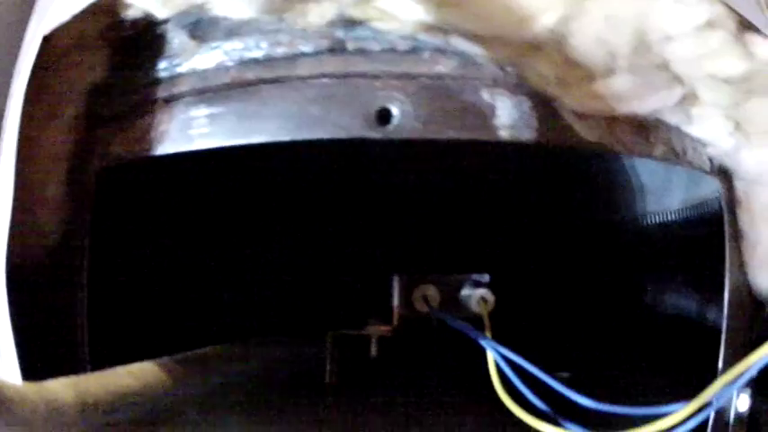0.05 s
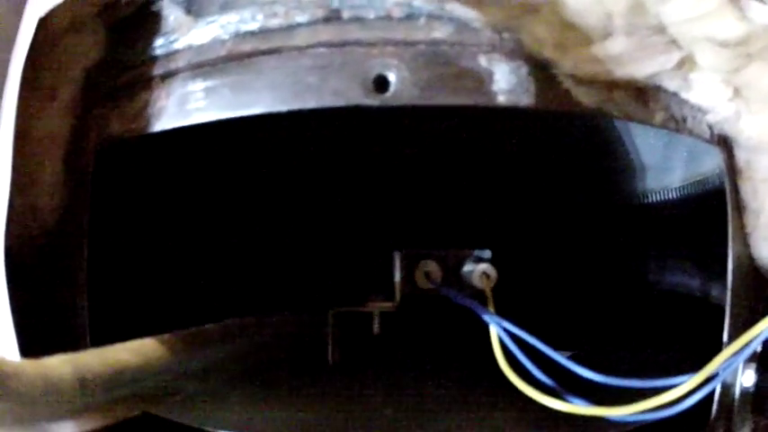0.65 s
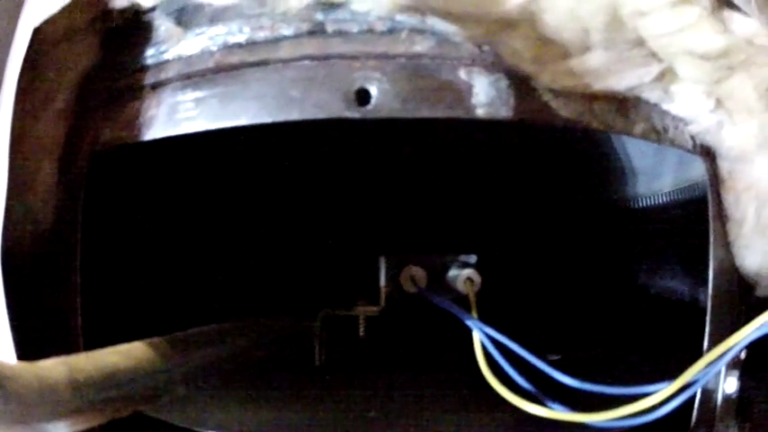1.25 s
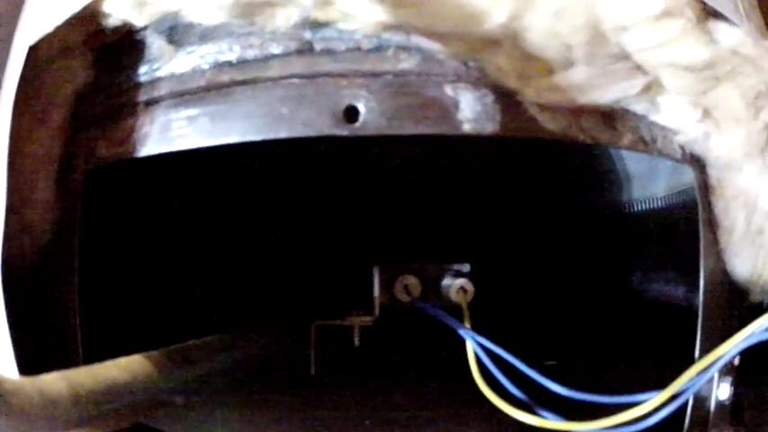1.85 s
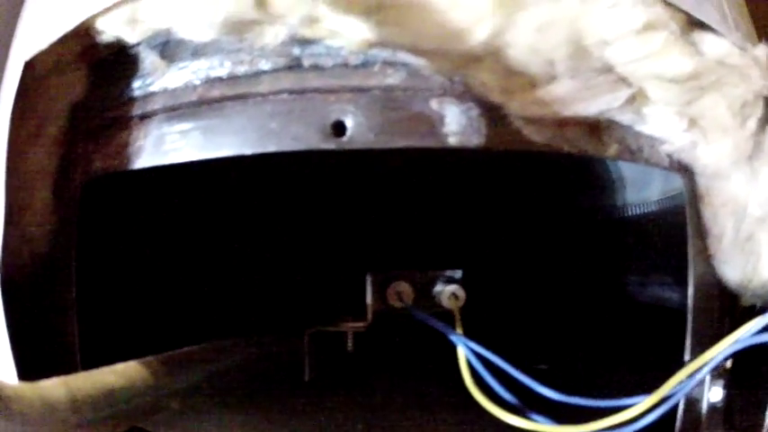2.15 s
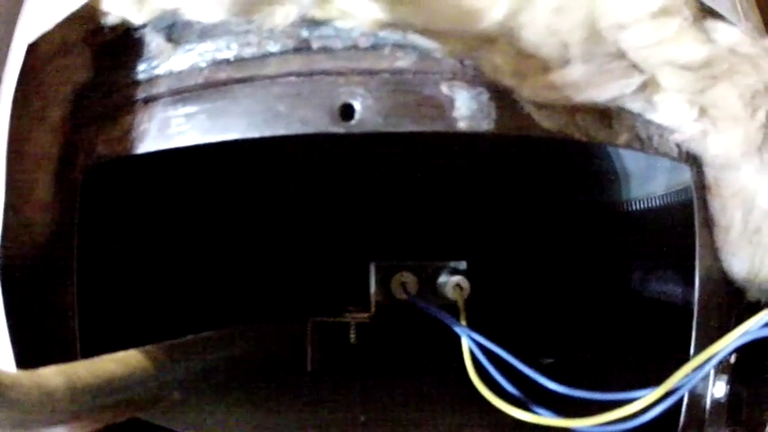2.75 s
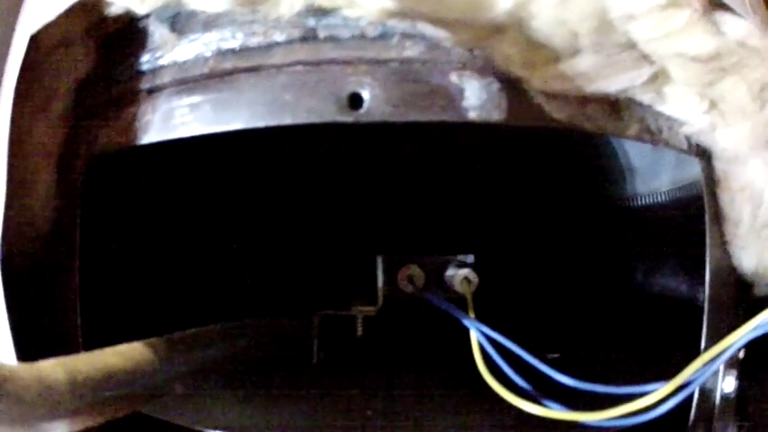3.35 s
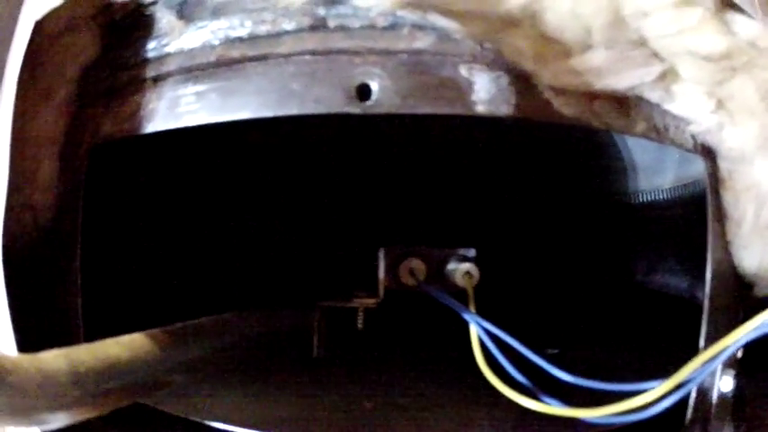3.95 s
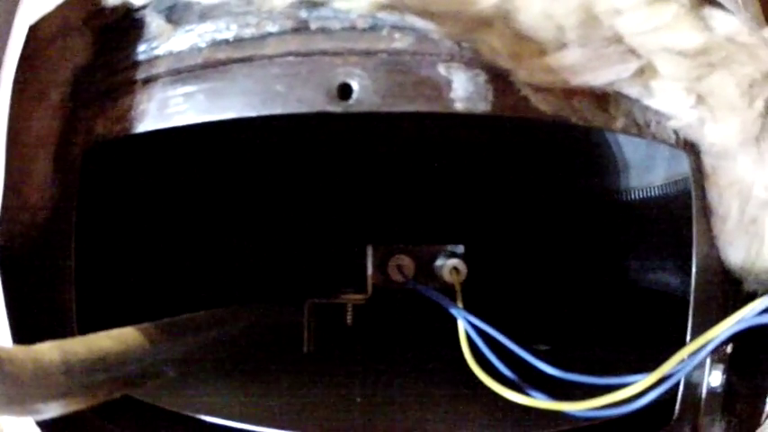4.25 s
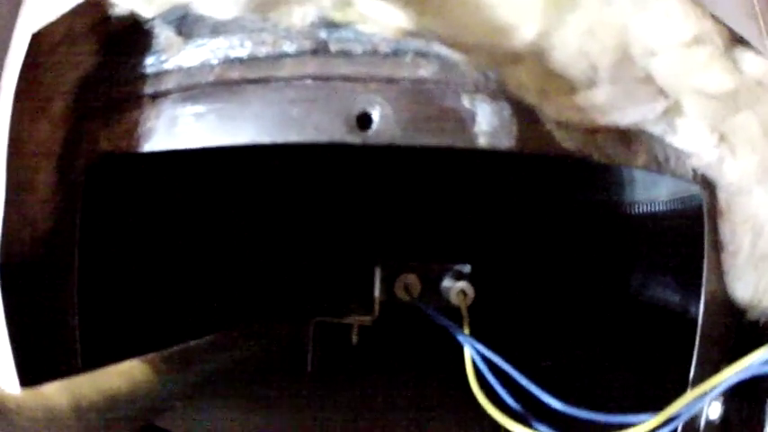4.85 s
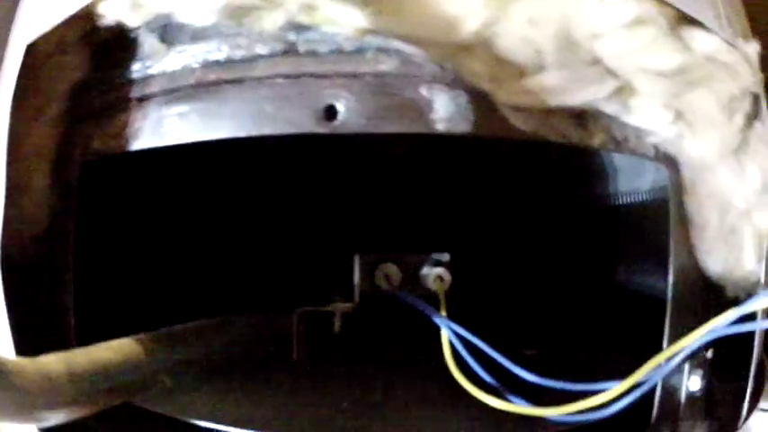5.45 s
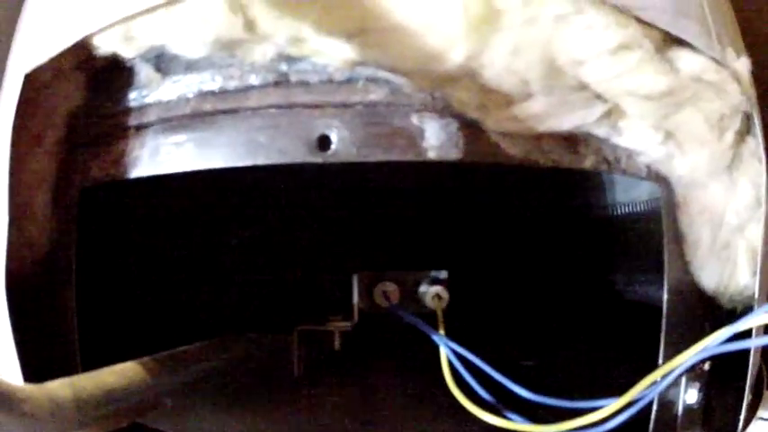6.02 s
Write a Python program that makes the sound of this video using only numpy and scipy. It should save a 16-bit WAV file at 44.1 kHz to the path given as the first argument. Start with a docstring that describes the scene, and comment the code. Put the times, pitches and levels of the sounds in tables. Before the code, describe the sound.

Heard close to the open hatch of a gas water heater in a utility space, the flue booms steadily as the blower pushes air through the vent. A faint motor whine and a thin high sizzle sit above the rumble. Small sounds barely break through: first a dull bump, then a brief rustle, a light metallic click and two last soft rustles, while the heater keeps running.

```python
"""A gas water heater runs in a utility space, heard close to its open burner hatch.
From the start, the venting blower's draught keeps the flue booming near 118 Hz, rings the tank's
cavities and rushes through the vent; the motor whines faintly. A dull bump comes at 1.2 s and a soft
rustle at 2.3 s; sheet metal ticks at 3.2 s, and two more rustles follow near 6 s. Throughout, a
low-rate sample-and-hold mirrors the sound into a thin treble sizzle."""
import sys
import numpy as np
from scipy import signal
from scipy.fft import rfft, irfft, next_fast_len
from scipy.io import wavfile
from scipy.ndimage import uniform_filter1d

SR = 44100
rng = np.random.default_rng(int(sys.argv[2]) if len(sys.argv) > 2 else 0)


def persist_wave(psi):
    """Save psi, clipped to +-1, as 16-bit WAV."""
    counts = np.round(np.clip(psi, -1, 1) * 32767).astype(np.int16)
    wavfile.write(sys.argv[1], SR, np.atleast_2d(counts).T)


N = 268348
TIME = np.arange(N) / SR

# The loudest random swells of the low boom.
# Each row: start in seconds, length in seconds, level in dB before SWELL_GAIN_DB.
BOOM_SWELLS = [(0.447, 0.081, -8), (0.609, 0.036, -5.5), (0.705, 0.035, -8), (1.142, 0.028, -8),
               (1.75, 0.039, -7.5), (3.115, 0.043, -8.5), (3.245, 0.088, -14), (3.583, 0.046, -9.5),
               (4.002, 0.047, -8), (4.264, 0.044, -7), (4.688, 0.033, -9), (4.902, 0.019, -5),
               (5.15, 0.055, -9), (5.514, 0.027, -6)]
# The flue's two lowest resonances. Each row: frequency in Hz, width in Hz, relative level in dB.
FLUE_MODES = [(116, 23, 0.5), (149.9, 33.7, -5.5)]
# Cavities of chamber and vent. Each row: frequency in Hz, width in Hz, relative level in dB.
CAVITY_MODES = [(202.5, 40.5, 0.5), (247.2, 38.7, 0.5), (320.9, 11.5, -11), (361, 25.7, -10.5),
                (456.4, 45, -14.5), (519.4, 26, -13), (610.4, 35, -12.5)]
# The rush of air. Each row: frequency in Hz, relative spectral density in dB.
RUSH_SPECTRUM = [(20, -11), (35, -11), (55, -2.5), (90, 6.5), (170, 2), (280, -7.5), (400, -13), (660, -15),
                 (790, -24.5), (1300, -22.5), (1700, -27.5), (2700, -31), (3600, -34), (5600, -37)]
# Resonances of the steel jacket. Each row: frequency in Hz, width in Hz, rms level in dB.
JACKET_MODES = [(734, 38, -54.5), (851, 58, -50), (990, 81, -53.5), (1163, 61, -48.5), (1410, 200, -52),
                (1795, 32, -56), (1980, 130, -54), (2306, 26, -60.5), (2527, 32, -57.5), (2580, 32, -56.5),
                (2667, 33, -60.5), (3210, 47, -60.5), (4664, 110, -60.5), (4990, 56, -60.5)]
# Tones of the blower. Each row: frequency in Hz, rms level in dB, pitch wander in Hz.
MOTOR_TONES = [(57.3, -38.5, 1), (430.6, -35, 1.265), (479.7, -42, 0.61), (743, -67, 0.78),
               (887, -54.5, 0.59), (995, -53, 0.51), (1903, -59, 0.67), (1978, -65, 0.78)]
# Soft rustles. Each row: centre in seconds, Gaussian width in seconds, rms level at the centre in dB.
RUSTLE_SWELLS = [(2.343, 0.018, -43), (5.73, .01, -43), (6.025, 0.01, -38.5)]
# The stutter of contacts in one tick. Each row: time in seconds, relative force in dB.
TICK_CONTACTS = [(3.248, -21), (3.2493, -15), (3.25, -22), (3.2503, -15.5), (3.2523, -24)]
# Modes of the sheet metal. Each row: frequency in Hz, gain in dB, time to fall 60 dB in seconds.
METAL_MODES = [(1157, -15, 0.045), (1690, -13.5, 0.039), (2400, -6, 0.022), (2720, -11.5, 0.033),
               (3200, -20, 0.012), (3510, -11, 0.017), (4480, -8.5, 0.071), (4760, -0.5, 0.012),
               (5390, -1, 0.021)]

BOOM_DB, THROB_DB, THROB_HZ, SWELL_GAIN_DB = -11, 1.15, 11.6, -1.5
CHURN_DB, CHURN_SWELL_DB, CHURN_SWELL_HZ = -22.5, 0.88, 3.8
RUSH_DB, FLUTTER_DB, FLUTTER_HZ = -24.5, 0.45, 14
BUMP_AT_S, BUMP_WIDTH_S, BUMP_DB = 1.175, 0.008, -26.5
CRACK_GAIN_DB, CRACK_T60_S, ROOM_GAIN_DB, ROOM_T60_S = -6.5, 0.013, -22.5, 0.13
BAND_HZ, HOLD_HZ, CUTOFF_HZ = 5500, 12000, 15400


def from_db(db):
    """Amplitude grows tenfold for every 20 dB."""
    return 10 ** (np.asarray(db) / 20)


def unit_rms(x):
    """Division by the rms gives a signal unit power."""
    return x / np.sqrt(np.mean(x ** 2) + 1e-20)


def drift(rate_hz):
    """Low-passed noise is a slow random fluctuation, here of unit spread."""
    step, settle = 40, 2000
    pole = np.exp(-2 * np.pi * rate_hz * step / SR)
    noise = rng.standard_normal(N // step + settle + 2)
    slow = signal.lfilter([1], [1, -2 * pole, pole ** 2], noise)[settle:]
    return np.interp(np.arange(N) / step, np.arange(len(slow)), unit_rms(slow))


def blown_modes(modes):
    """Forced resonance: turbulence drives each mode to a steady, narrow band of noise."""
    out = np.zeros(N)
    for hz, width, db in modes:
        radius = np.exp(-np.pi * width / SR)
        stage = [1 - radius, 0, radius - 1, 1, -2 * radius * np.cos(2 * np.pi * hz / SR), radius ** 2]
        turbulence = rng.standard_normal(N + SR // 2)
        out += from_db(db) * unit_rms(signal.sosfilt([stage, stage], turbulence)[-N:])
    return out


def compress(x, seconds, share):
    """Compression removes a share of the swells slower than the given time; unit rms."""
    power = np.abs(signal.hilbert(x, next_fast_len(N))[:N]) ** 2
    swell = uniform_filter1d(power, int(seconds * SR)) + 1e-12
    return unit_rms(x / swell ** (share / 2))


def coloured_noise(spectrum):
    """Spectral weighting bends white noise to a curve of (Hz, dB) points; unit rms."""
    size = next_fast_len(N)
    hz, db = np.transpose(spectrum)
    bin_hz = np.maximum(np.fft.rfftfreq(size, 1 / SR), 1)
    gain = from_db(np.interp(np.log(bin_hz), np.log(hz), db))
    return unit_rms(irfft(rfft(rng.standard_normal(size)) * gain, size)[:N])


def boom_envelope():
    """A throbbing base level and bell-shaped swells add in power to set the boom's amplitude."""
    base = from_db(BOOM_DB + THROB_DB * drift(THROB_HZ))
    power = base ** 2
    for start, length, db in BOOM_SWELLS:
        bell = np.exp(-2 * ((TIME - start - length / 2) / length) ** 2)
        power += from_db(db + SWELL_GAIN_DB) ** 2 * bell
    return np.sqrt(power)


def flue_boom():
    """The air column oscillates near saturation; the open flue radiates little below its lowest mode."""
    lowest = compress(blown_modes(FLUE_MODES[:1]), seconds=0.0077, share=0.62)
    column = lowest + blown_modes(FLUE_MODES[1:])
    radiated = signal.sosfilt(signal.butter(4, 75, "high", fs=SR, output="sos"), column)
    return boom_envelope() * compress(radiated, seconds=0.099, share=0.46)


def cavity_churn():
    """Turbulence excites the cavity resonances of chamber and vent, swelling at random."""
    swell = from_db(CHURN_DB + CHURN_SWELL_DB * drift(CHURN_SWELL_HZ))
    return swell * compress(blown_modes(CAVITY_MODES), seconds=0.2, share=0.6)


def airflow():
    """The unsteady flow modulates the broadband rush and the jacket's resonances together."""
    flutter = from_db(FLUTTER_DB * drift(FLUTTER_HZ))
    rush = from_db(RUSH_DB) * coloured_noise(RUSH_SPECTRUM)
    return flutter * (rush + blown_modes(JACKET_MODES))


def motor_whine():
    """The motor's pure tones waver under slow, random modulation of frequency and amplitude."""
    out = np.zeros(N)
    for hz, db, wander_hz in MOTOR_TONES:
        cycles = np.cumsum(hz + wander_hz * drift(rate_hz=3.3)) / SR + rng.random()
        amplitude = np.sqrt(2) * from_db(db + 0.84 * drift(rate_hz=3.6))
        out += amplitude * np.sin(2 * np.pi * cycles)
    return out


def dull_bump():
    """A Gaussian envelope shapes a brief, dull burst of low-middle noise."""
    swell = from_db(BUMP_DB) * np.exp(-0.5 * ((TIME - BUMP_AT_S) / BUMP_WIDTH_S) ** 2)
    return swell * coloured_noise([(150, -20), (400, 3), (700, -3), (1200, -17), (4000, -40)])


def rustles():
    """Gaussian envelopes on upper-middle noise are heard as faint rustles."""
    swell = sum(from_db(db) * np.exp(-0.5 * ((TIME - centre) / width) ** 2)
                for centre, width, db in RUSTLE_SWELLS)
    return swell * coloured_noise([(300, -20), (1500, 3), (3000, 1), (5500, -11), (12000, -40)])


def reflections(force, t60):
    """Dense reflections merge into bright noise that decays exponentially after each contact."""
    decay = from_db(-60 / (t60 * SR))
    envelope = signal.lfilter([1], [1, -decay], force + 1e-18)
    high_pass = signal.butter(2, 2900, "high", fs=SR, output="sos")
    return envelope * unit_rms(signal.sosfilt(high_pass, rng.standard_normal(N)))


def struck_mode(force, hz, t60):
    """A damped oscillator answers a unit impulse with a sine decaying from unit height."""
    decay, angle = from_db(-60 / (t60 * SR)), 2 * np.pi * hz / SR
    return signal.lfilter([0, np.sin(angle)], [1, -2 * decay * np.cos(angle), decay ** 2], force + 1e-18)


def metal_tick():
    """Impact excitation: each contact cracks and stirs the room; the hardest rings the sheet metal."""
    force = np.zeros(N)
    for seconds, db in TICK_CONTACTS:
        force[round(seconds * SR)] = from_db(db)
    crack = from_db(CRACK_GAIN_DB) * reflections(force, CRACK_T60_S)
    room_tail = from_db(ROOM_GAIN_DB) * reflections(force, ROOM_T60_S)
    hardest = force * (force == force.max())
    ringing = sum((-1) ** k * from_db(db) * struck_mode(hardest, hz, t60)   # modes alternate in sign
                  for k, (hz, db, t60) in enumerate(METAL_MODES))
    return crack + room_tail + ringing


def scene():
    """Superposition: the pressures of all sources add at one point by the hatch."""
    running = flue_boom() + cavity_churn() + airflow() + motor_whine()
    return (running + dull_bump() + rustles() + metal_tick())[None]


def record(dry):
    """Spectral imaging: held samples mirror the band-limited sound about the hold rate."""
    narrow = signal.sosfilt(signal.butter(12, BAND_HZ, fs=SR, output="sos"), dry)
    rounded = narrow / (1 + narrow ** 8) ** (1 / 8)   # soft clipping of the peaks
    slow = signal.resample_poly(rounded, HOLD_HZ, SR, axis=1)
    steps = np.repeat(slow, 4, axis=1)
    held = signal.resample_poly(steps, SR, 4 * HOLD_HZ, axis=1)[:, :N]
    low_pass = signal.ellip(12, 0.2, 90, CUTOFF_HZ, fs=SR, output="sos")
    return signal.sosfilt(low_pass, held)


dry = scene()
out = record(dry)
persist_wave(out)
```